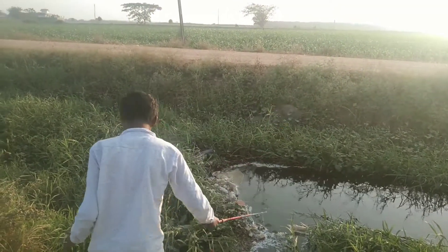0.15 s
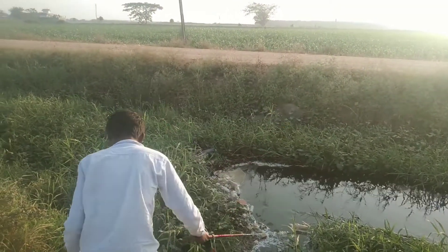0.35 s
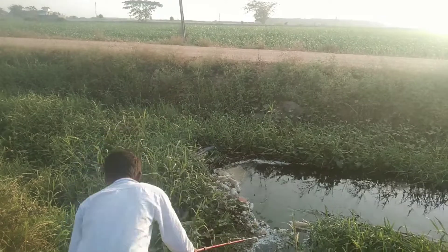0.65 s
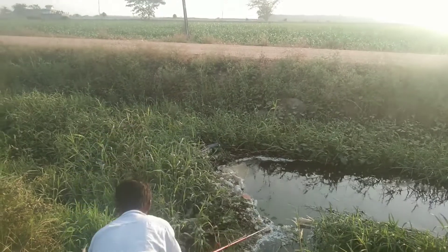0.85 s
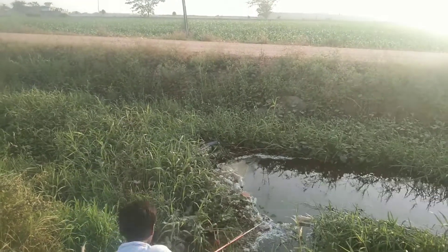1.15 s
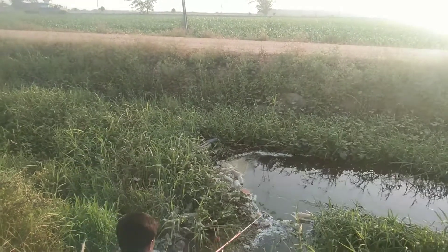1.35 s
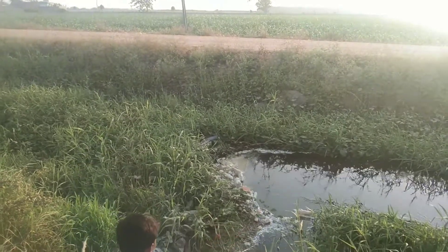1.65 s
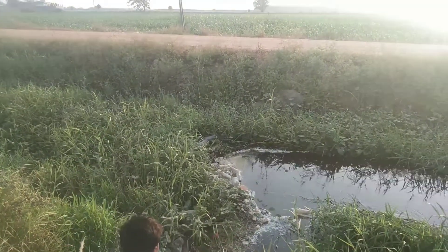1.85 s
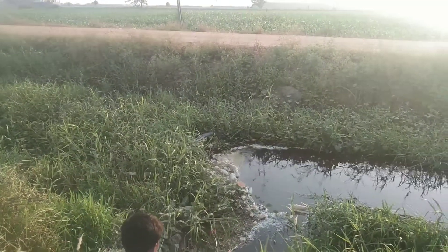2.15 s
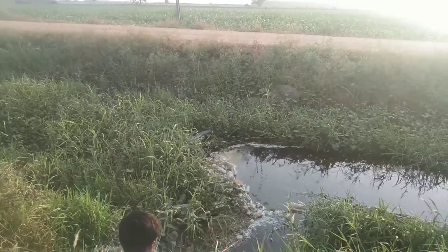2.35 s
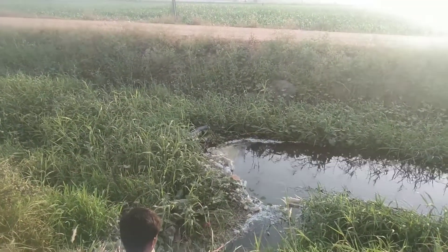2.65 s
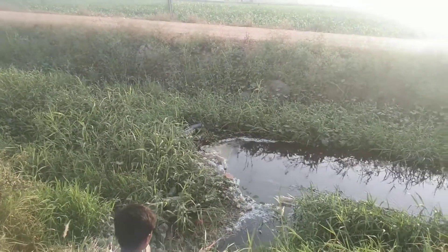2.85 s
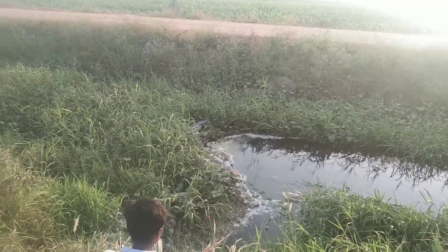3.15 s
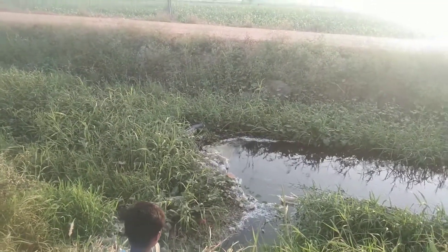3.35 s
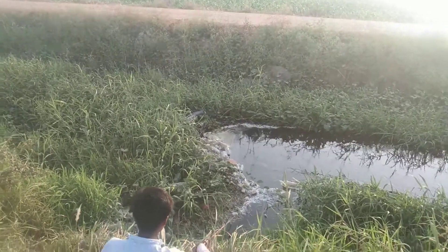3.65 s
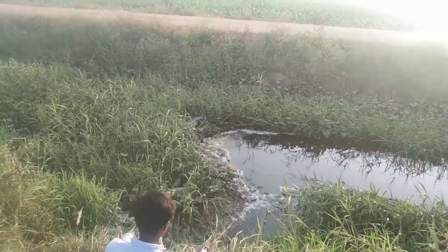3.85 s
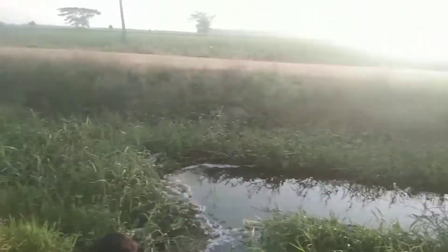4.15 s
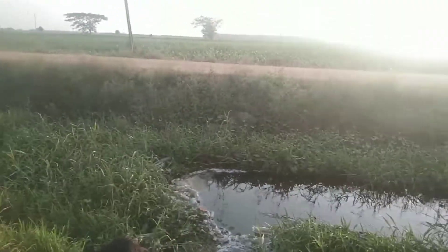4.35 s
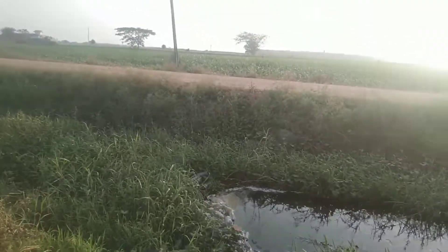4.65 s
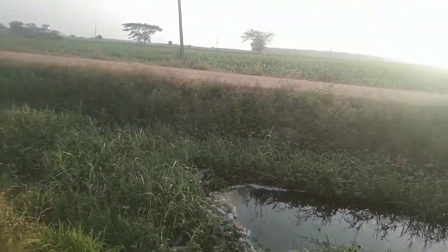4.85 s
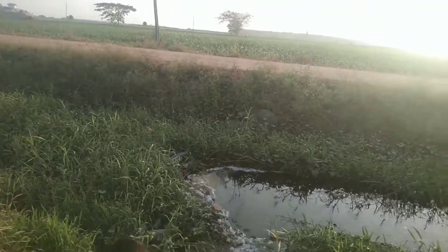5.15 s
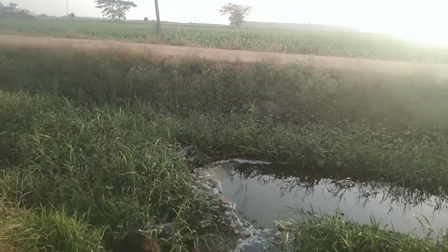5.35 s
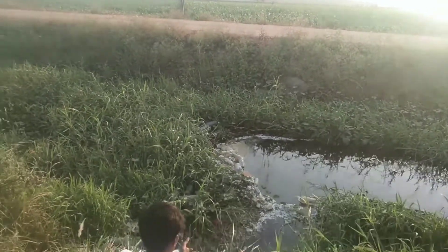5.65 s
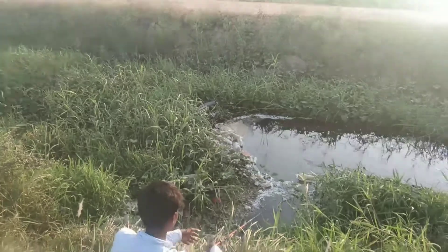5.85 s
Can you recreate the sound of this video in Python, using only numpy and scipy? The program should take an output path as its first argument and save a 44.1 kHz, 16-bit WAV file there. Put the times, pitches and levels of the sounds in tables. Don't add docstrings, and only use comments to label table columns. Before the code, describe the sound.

A phone-like microphone in open fields catches a low, pulsing motorcycle pulling away, its valve gear and chain rattling over tyre noise. Crisp grass brushing, snapping stems and faint cloth slides sit very near. Midway come a quick chirp, soft thuds and a small rubbing squeak. High insect trills grow clearer over the faint field hiss, before crackling stalks and a final loud, short knock with scratchy ticks.

```python
import sys
import numpy as np
from scipy import signal
from scipy.fft import rfft, irfft
from scipy.io import wavfile
from scipy.ndimage import uniform_filter1d

SR = 44100
rng = np.random.default_rng(int(sys.argv[2]) if len(sys.argv) > 2 else 0)


def pcm_store(signal):
    levels = np.round(np.clip(np.atleast_2d(signal), -1, 1) * 32767)
    wavfile.write(sys.argv[1], SR, levels.astype(np.int16).T)


def gain_from_db(level_db):
    decades = np.asarray(level_db, float) / 20
    return 10 ** decades


N = 264600

# pitch [Hz], width [Hz], level [dB].
CHAIN = [(6420, 300, 0), (5740, 740, 7), (4920, 1000, -2), (4450, 1440, 3.5), (3700, 70, -30)]
# pitch [Hz], width [Hz], level [dB].
AIR = [(10100, 2800, 8.5), (14200, 1900, 5), (12430, 2700, 2.5), (8400, 1400, -4)]


def level(x, db):
    return x * gain_from_db(db) / np.sqrt(np.mean(x ** 2))


def curve(table):
    s, *columns = np.transpose(table)
    return [np.interp(np.arange(N) / SR, s, c) for c in columns]


def ring(x, hz, width_hz):
    return signal.lfilter(*signal.iirpeak(hz, hz / width_hz, fs=SR), x)


def body(x, modes):
    return sum(gain_from_db(db) * ring(ring(x, hz, 1.38 * w), hz, 1.38 * w) for hz, w, db in modes)


def colour(x, spectrum):
    hz, db = np.transpose(spectrum)
    bin_hz = np.arange(N // 2 + 1) * SR / N
    return irfft(rfft(x) * gain_from_db(np.interp(np.log(bin_hz + 1), np.log(hz), db)), N)


def walk(rate):
    k = int(SR / rate)
    held = np.repeat(rng.standard_normal(N // k + 1), k)
    return 1.31 * uniform_filter1d(uniform_filter1d(held, k), k)[:N]


def grit(per_s, spread_db):
    size = gain_from_db(spread_db * np.minimum(rng.exponential(size=N), 3.5))
    strikes = (rng.random(N) < per_s / SR) * size
    return signal.lfilter([1], [1, -.98], strikes) * rng.standard_normal(N)


def add(out, s, sound):
    i = int(s * SR)
    part = sound[max(-i, 0):N - i]
    out[max(i, 0):max(i, 0) + len(part)] += part


def receding(start_db, share):
    # time [s], level [dB].
    distance = [(0, 0.5), (.5, -3), (1.0, -5), (1.7, -8.5), (2.4, -11), (3.3, -15), (3.9, -15),
                (4.4, -19.5), (5.0, -19), (6, -23.5)]
    return gain_from_db(start_db + share * curve(distance)[0])


def thump():
    # pitch [Hz], width [Hz], signed share, stages [count].
    exhaust = [(150, 50, .46, 3), (82, 44, -.45, 1), (182, 38, -.14, 2), (293, 166, -.17, 2),
               (133, 28, .93, 1)]
    out = 0
    for hz, width, share, stages in exhaust:
        part = np.r_[1., np.zeros(4000)]
        for _ in range(stages):
            part = ring(part, hz, width)
        out = out + share * part / np.abs(part).max()
    return uniform_filter1d(np.r_[np.zeros(44), out], 44)


def motorcycle():
    # time [s], firings per second.
    speed = [(0, 14.967), (.3, 15.196), (.6, 15.946), (1, 15.679), (1.2, 16.454), (1.6, 16.349),
             (1.8, 16.836), (2.2, 16.925), (2.8, 17.431), (3.3, 17.025), (3.5, 18.541), (3.8, 18.5),
             (4.2, 18.498), (4.6, 18.999), (5.3, 19.103), (6, 19.442)]
    # time [s], ping [Hz], ping [dB], valve shade [dB].
    tappet = [(0, 2550, -61, -4), (.8, 2615, -49, 4.5), (1.2, 2200, -64, 1.5), (1.8, 2160, -61, 4),
              (3.2, 2200, -57, 3), (3.5, 2140, -60, 1.5), (3.9, 1620, -71, -24), (4.3, 1630, -61, -3),
              (4.8, 1615, -64, 4), (6, 1600, -57.5, -25)]
    # time [s], level [dB].
    case_shade = [(0, -5), (.2, 0.5), (.65, 1.5), (1.2, 0), (1.75, 4), (2.3, 4), (3, 4.5), (3.5, 4),
                  (3.9, 3), (4.3, 1), (5.2, -5), (6, -1)]
    # frequency [Hz], density [dB per Hz].
    gas = [(1500, -15), (2500, -2), (3600, -2.5), (5200, -1.5), (7200, -1), (8500, -22), (15000, -54)]
    # pitch [Hz], width [Hz], level [dB].
    cases = [(717, 56, 3.5), (520, 270, -7), (347, 380, -1), (870, 1300, -18.5)]
    # pitch [Hz], width [Hz], level [dB].
    valves = [(2200, 240, 0.5), (1900, 75, 6.8), (2367, 204, 2.5), (2600, 450, 0.5)]
    # level at the start [dB], share of the distance loss.
    part_levels = [(-48.5, 0.72), (-53, 0.79), (-55.5, 0.36), (-68.5, 0.67)]

    cycles = .135 + np.cumsum(curve(speed)[0]) / SR
    count = np.arange(1, int(cycles[-1]) + 1)
    chance = rng.standard_normal((len(count) + 1, 5))
    fire_s = np.interp(count, cycles, np.arange(N) / SR)
    fire_s = np.r_[2 * fire_s[0] - fire_s[1], fire_s] + .0006 * chance[:, 0]
    ping_hz, ping_db, shade_db = curve(tappet)
    thumps, gate, pings, slug = np.zeros(N), np.zeros(N), np.zeros(N), thump()
    t, step = np.arange(2048) / SR, np.arange(len(slug))
    tail = 11 * np.maximum(step / SR - .014, 0)
    puff = t / 0.0064 * np.exp(1 - t / 0.011)
    ping_shape = t / 0.0095 * np.exp(1 - t / 0.0048)
    for at, luck in zip(fire_s, chance):
        pitched = np.interp(step * (1 + .025 * luck[4]), step, slug)
        damping = np.exp(-np.clip(at - .2, 0, 4) * tail)
        add(thumps, at - .0094, gain_from_db(0.9 * luck[1]) * pitched * damping)
        add(gate, at - .013, gain_from_db(1.6 * luck[2]) * puff)
        hz = ping_hz[int(max(at, 0) * SR)] * (1 + .015 * luck[4])
        tone = np.sin(2 * np.pi * hz * t * (1 + 0.38 * t))
        add(pings, at - .007, gain_from_db(1.5 * luck[3]) * ping_shape * tone)
    out = thumps * receding(-23, 0.92) + 2 * pings * gain_from_db(ping_db)

    spit = rng.standard_normal(N) + level(grit(350, spread_db=4.5), 5.1)
    hiss = colour(spit, gas) * (1.0 + 0.24 * gate ** 2) * gain_from_db(0.19 * walk(12))
    out += level(hiss, 0) * receding(-54.5, 0.91)

    beats = (0.63, 0.22, 1.0, 0.11)
    shades = (curve(case_shade)[0], shade_db, 0, 0)
    for part, modes, beat, shade in zip(part_levels, (cases, valves, CHAIN, AIR), beats, shades):
        rattle = rng.standard_normal(N) + level(grit(500, spread_db=3.5), -5.5)
        rattle = rattle * (1 + beat * gate) * gain_from_db(1.1 * walk(11))
        out += level(body(rattle, modes), -2.84) * receding(*part) * gain_from_db(shade)
    return out


def tyres():
    # time [s], roughness [dB].
    road = [
        (0, 6.5),
        (.2, 4),
        (1.4, -3.5),
        (2.3, -16),
        (3.5, 0.5),
        (4.8, 6),
        (6, -8),
    ]
    bumps = rng.standard_normal(N) * gain_from_db(2.0 * walk(14))
    roll = body(bumps, [(980, 390, 6.0), (1172, 124, 6), (1600, 78, -31)])
    return level(roll, -4.0) * receding(-53.5, 0.66) * gain_from_db(curve(road)[0])


def fields():
    # frequency [Hz], density [dB per Hz].
    land = [(24, -41), (40, -9), (70, -3), (150, -4), (235, -8.5), (417, -9.5), (740, -4), (838, -13),
            (1280, -16.5), (1600, -16.5), (1910, -20), (3000, -23.5), (3950, -22.5), (4500, -24.5),
            (5200, -21), (6700, -16.5), (7300, -19.5), (7800, -27), (9650, -40.5), (15500, -107)]
    swell = walk(0.82)
    out = np.zeros(N)
    for edges in [(45, 250), (250, 1000), (1000, 3200), (3200, 5500), (5500, 16000)]:
        band = signal.butter(2, edges, "band", fs=SR, output="sos")
        out += signal.sosfilt(band, rng.standard_normal(N)) * gain_from_db(.6 * swell + 1.2 * walk(8))
    return level(colour(out, land), -54.5)


def brush(s, rise, fall):
    t = np.arange(N) / SR - s
    return gain_from_db(-20 * np.where(t < 0, -t / rise, t / fall))


def grass():
    # peak [s], rise [s], fall [s], peak [dB], treble tilt [dB].
    clumps = [(.02, 0.057, .3, -52, -4), (.33, 0.075, 0.062, -53, 3), (.84, 0.066, 0.061, -34, -5),
              (.888, 0.032, 0.039, -38, -4.5), (.985, 0.038, 0.068, -36.5, -2),
              (1.025, 0.038, 0.12, -38.5, -4), (1.68, 0.13, 0.073, -41.5, -6.5),
              (2.294, 0.083, 0.27, -52, -10), (2.466, 0.029, .04, -51, -7), (2.55, 0.069, 0.17, -47, -7),
              (3.6, 0.1, 0.034, -52.5, -11), (3.68, 0.047, 0.17, -46.5, -11),
              (3.848, 0.073, 0.095, -46.5, -4.5), (4.334, 0.17, 0.069, -49, -5),
              (4.95, 0.041, 0.12, -62, 12.5), (5.3, 0.023, 0.32, -60, 5), (5.58, 0.087, 0.095, -58.5, 8),
              (3.47, 0.12, 0.069, -59, -15), (4.0, 0.099, 0.2, -59.5, 8)]
    # peak [s], rise [s], fall [s], peak [dB], treble tilt [dB].
    stalks = [
        (5.077, 0.0032, 0.1, -48, .1),
        (5.118, 0.046, 0.057, -37.5, -0.9),
        (5.15, 0.047, 0.036, -46.5, .1),
    ]
    # peak [s], rise [s], fall [s], peak [dB], treble tilt [dB].
    scrapes = [
        (5.886, 0.0071, 0.052, -33.5, .1),
        (5.903, 0.018, 0.027, -32.5, .1),
    ]
    # frequency [Hz], density [dB per Hz].
    green = [(150, -1), (250, -7), (646, 0), (729, -10.5), (781, -10.5), (1730, -8.5), (1890, -6),
             (2160, -7.5), (2950, -5.5), (3630, -10), (6650, -4), (8320, -23), (15500, -59)]
    # frequency [Hz], density [dB per Hz].
    dry_blades = [(180, -44), (300, -7), (484, -12), (581, -24), (674, 2), (769, -8), (907, 1), (1390, 1),
                  (2690, 0), (2880, -1), (6460, -1.5), (8010, -22), (15500, -58)]
    # frequency [Hz], density [dB per Hz].
    husk = [(180, -34), (300, -6.5), (1030, -8.5), (1350, -7.5), (1490, -9), (1840, -9), (2000, -8),
            (2740, -11), (2930, -15.5), (6460, -2), (8990, -32), (11900, -34), (15500, -23)]
    crackle = level(grit(2200, spread_db=2.0), 0) + 0.62 * rng.standard_normal(N)
    crackle = crackle * gain_from_db(2.26 * walk(70))
    out = np.zeros(N)
    for rows, blades in ((clumps, green), (stalks, dry_blades), (scrapes, husk)):
        sound = level(colour(crackle, blades), -3.5)
        low = signal.filtfilt(*signal.butter(1, 1500, fs=SR), sound)
        for s, rise, fall, db, tilt_db in rows:
            tilted = gain_from_db(-tilt_db) * low + gain_from_db(tilt_db) * (sound - low)
            out += gain_from_db(db) * brush(s, rise, fall) * tilted
    return out


def ticks():
    # start [s], peak [dB], ring [Hz], t60 [s].
    clanks = [(0.006, -39, 4500, 0.042), (0.0498, -36, 2600, .05), (0.1201, -33, 2490, 0.048),
              (0.1855, -37, 2330, .04), (0.2508, -35.5, 3380, 0.035), (0.273, -39, 4000, 0.019),
              (0.3152, -38, 3930, .03), (0.3351, -35.5, 4820, 0.05), (0.383, -37, 3620, 0.028),
              (0.4474, -41, 2670, 0.055), (0.476, -40, 4130, .03), (0.5122, -35, 3500, 0.05),
              (0.575, -44, 2500, .04), (1.329, -36, 4020, 0.03), (1.385, -44, 2150, 0.064),
              (1.475, -42, 1840, .07), (1.745, -37.5, 2200, .1), (2.045, -40, 2120, 0.079),
              (2.22, -47, 2160, 0.064), (2.345, -45, 2130, .06), (2.52, -39, 2200, 0.071),
              (2.69, -43, 2200, 0.0635), (2.745, -43, 2260, .06), (1.84, -44, 1900, 0.083),
              (1.93, -39, 2200, 0.063), (1.988, -38, 2200, .06), (2.105, -40.5, 1920, 0.065),
              (2.863, -42, 2200, 0.067), (2.92, -41, 2170, .07), (2.978, -41, 2200, .06),
              (3.152, -43, 2200, 0.075), (3.212, -44, 2190, 0.05)]
    # start [s], peak [dB], ring [Hz], t60 [s].
    case_rings = [(.111, -47, 735, 0.094), (.174, -38, 740, .12), (.241, -40, 721, .1),
                  (.376, -43, 713, .1), (.444, -39, 725, .1), (.505, -44, 762, 0.049),
                  (.563, -34, 744, 0.088), (.616, -51, 720, .1), (.637, -40, 745, 0.143),
                  (.69, -38, 740, 0.11), (.829, -40, 600, 0.055), (.856, -38, 700, 0.046)]
    # start [s], peak [dB], ring [Hz], t60 [s].
    twigs = [(0.114, -34.5, 4050, 0.056), (0.383, -35, 2730, 0.024), (0.511, -39, 2480, 0.042),
             (0.7564, -32, 2480, 0.045), (1.329, -32, 2300, 0.024), (1.8517, -36, 6310, 0.046),
             (2.104, -37, 6300, 0.023), (2.272, -38, 6750, 0.039), (2.333, -36, 6200, 0.029),
             (2.557, -36.5, 6300, 0.031), (2.953, -41.5, 5800, 0.041), (3.7523, -37.5, 6670, 0.023),
             (4.8047, -41, 3880, 0.021), (4.8995, -39, 6350, 0.026), (5.075, -38, 1280, 0.032),
             (5.113, -39, 1900, .03), (5.1197, -35, 1400, 0.037), (5.1416, -34, 1220, 0.047),
             (3.0098, -43, 6400, 0.028), (3.3281, -48, 4960, .04), (3.4428, -46, 4870, .03),
             (2.81, -45, 2150, .06), (3.04, -44, 2200, .06)]
    # start [s], peak [dB], ring [Hz], t60 [s].
    stems = [(0.8248, -34, 900, 0.032), (0.833, -31, 2940, .03), (0.8362, -29, 1970, 0.055),
             (0.845, -32, 2820, .04), (0.856, -34, 1900, 0.0406), (0.868, -39, 2430, .04),
             (0.879, -33, 3020, 0.033), (0.892, -32.5, 1450, .04), (0.8856, -32.5, 2580, .04),
             (0.9679, -34.5, 6630, 0.055), (0.9854, -34, 5560, 0.0314), (1.003, -41, 2500, .02),
             (1.0218, -32, 5200, 0.043), (1.0228, -34.5, 2080, 0.037), (1.065, -37, 6500, .03),
             (1.646, -38.5, 2460, .04), (1.672, -38, 4400, 0.037), (3.595, -43, 2280, 0.043),
             (3.685, -44, 2200, .05), (3.735, -42, 2550, .05), (3.845, -43, 2250, 0.042),
             (3.905, -45, 2790, .04), (5.084, -45, 4240, .02), (5.099, -36, 2280, .04),
             (5.142, -41, 3960, .03), (5.301, -45, 6050, .04), (5.325, -40, 5440, .03),
             (5.334, -46, 7100, .02)]
    # start [s], peak [dB], ring [Hz], t60 [s].
    husk_ticks = [
        (5.8866, -19, 6200, 0.005),
        (5.8911, -24, 6000, .006),
        (5.8953, -25, 6330, .015),
        (5.8987, -23, 6270, 0.005),
        (5.9045, -27, 6000, .015),
        (5.9148, -29, 5550, 0.006),
    ]
    strikes = [(*row, 1, 0) for row in twigs + husk_ticks + stems]
    strikes += [(*row, .9 if row[0] < 1 else .25, 1.5) for row in clanks]
    strikes += [(*row, .15, 0) for row in case_rings]
    out, t = np.zeros(N), np.arange(3000) / SR
    for s, db, hz, t60, rough, glide in strikes:
        noise = rng.standard_normal(len(t))
        crack = 0.19 * ring(noise, 4000, 4400) + 1.25 * ring(noise, hz, 0.32 * hz)
        rise_s = .07 * t60
        shape = np.minimum(t / rise_s, 1) * np.exp(-np.log(1000) * t / t60)
        tone = np.sin(2 * np.pi * hz * t * (1 + glide * (t - .015)))
        add(out, s - rise_s / 2, gain_from_db(db) * shape * (0.5 * tone + rough * crack))
    return signal.sosfilt(signal.butter(6, 7600, fs=SR, output="sos"), out)


def slides():
    # start [s], length [s], level [dB].
    strokes = [
        (0.481, 0.26, -62),
        (0.824, 0.051, -69),
        (1.391, 0.061, -66.5),
        (5.88, 0.043, -62),
    ]
    t, noise = np.arange(N) / SR, rng.standard_normal(N) * gain_from_db(1.0 * walk(20.2))
    hiss = level(body(noise, AIR), -1.1) + level(body(noise, CHAIN), 8.5)
    gain = np.zeros(N)
    for s, length, db in strokes:
        fade = np.minimum((t - s) / 0.023, (s + length - t) / 0.011)
        gain += gain_from_db(db) * np.clip(fade, 0, 1)
    return hiss * gain


def snaps():
    # start [s], peak [dB].
    clicks = [
        (0.7133, -37),
        (2.01, -45),
        (2.0323, -46),
        (3.675, -50),
        (5.8855, -44),
    ]
    out, t = np.zeros(N), np.arange(SR // 4) / SR
    for s, db in clicks:
        add(out, s, gain_from_db(db) * np.exp(-t / 0.000097) * np.cos(2 * np.pi * 13000 * t) * 1.4)
    return out


def reeds():
    # pitch [Hz], resting level [dB], swells of peak [s], width [s], level [dB].
    singers = [
        (6580, -80, [(.7, 0.12, -52), (1.8, 0.39, -55), (2.35, 0.35, -59), (3.78, 0.17, -55)]),
        (7000, -68, [(2.9, 1, -91), (4.65, 0.25, -73), (5.38, 0.057, -56), (5.6, 0.17, -66)]),
        (4490, -68.5, [(3.3, 0.041, -69), (5.0, 0.17, -67)]),
        (6000, -80, [(3.58, .04, -62), (3.75, 0.14, -58), (3.9, 0.067, -67)]),
    ]
    out, t = 0, np.arange(N) / SR
    for hz, rest_db, swells in singers:
        gain = gain_from_db(rest_db) + sum(gain_from_db(db) * np.exp(-((t - s) / width) ** 2) for s, width, db in swells)
        starts = (rng.random(N) < 170 / SR) * gain_from_db(1.8 * rng.standard_normal(N))
        notes = signal.fftconvolve(starts, np.hanning(600))[:N]
        waver = 1 + .008 * walk(2) + .012 * walk(30) + .022 * walk(400)
        tone = np.sin(2 * np.pi * np.cumsum(hz * waver) / SR)
        out = out + level(notes * tone, -4.0) * gain
    return out


def even_cricket():
    # time [s], level [dB].
    song = [(2.6, -80), (3.1, -71), (3.4, -82), (4.1, -76), (4.3, -67), (4.7, -66), (4.9, -73), (5.08, -69),
            (5.25, -76), (5.4, -66), (5.7, -69), (6, -78)]
    pitch_hz, notes_per_s = 7050, 27.5
    beat = np.cumsum(notes_per_s * (1 + .08 * walk(5))) / SR
    waver = 1 + .004 * walk(60) + .006 * walk(500)
    tone = np.sin(2 * np.pi * np.cumsum(pitch_hz * waver) / SR)
    return level(np.sin(np.pi * beat) ** 4 * gain_from_db(2.5 * walk(20)) * tone, 0) * gain_from_db(curve(song)[0])


def cricket():
    # end [s], upper wing [dB], lower wing [dB], lower wing [Hz].
    trills = [(2.68, -71, -80, 7630), (2.825, -70, -80, 7630), (2.985, -72, -74, 7630),
              (3.15, -71, -67.5, 7640), (3.305, -74, -67, 7640), (3.475, -74, -67.5, 7640),
              (3.635, -73, -71, 7650), (3.71, -74, -77, 7650), (3.84, -70, -74, 7600),
              (3.965, -71, -72, 7600), (4.1, -72, -72, 7700), (4.2, -72, -76, 7600), (4.3, -73, -71, 7500),
              (4.485, -72, -72, 7600), (4.615, -72, -70, 7800), (4.75, -71, -76, 7600),
              (4.8, -77, -71, 7750), (4.95, -77, -69, 7700), (5.1, -75, -69, 7820), (5.28, -73, -71, 7800),
              (5.445, -74, -68, 7900), (5.585, -77, -73, 7700), (5.71, -76, -67, 7930),
              (5.875, -76, -67, 7900), (6.05, -80, -71, 7930)]
    trill_s, strokes_per_s, upper_hz = 0.13, 106.3, 8190
    out, t = np.zeros(N), np.arange(int(trill_s * SR)) / SR
    stroke = np.abs(np.sin(np.pi * strokes_per_s * (t - trill_s)) ** 3) * (.7 + t / trill_s)
    which = ((trill_s - t) * strokes_per_s).astype(int)
    songs = [(1 + k * .131, -77, 8600) for k in range(12)]
    songs += [(s, up, upper_hz) for s, up, *_ in trills]
    songs += [(s, low, hz) for s, _, low, hz in trills]
    for end, db, hz in songs:
        slip, size, bend = rng.standard_normal((3, 32))[:, which]
        creep = .0006 + .0028 * (end > 4.4) * (hz < upper_hz)
        pitch = hz * (1 + .008 * bend - creep * which)
        trill = stroke * gain_from_db(1.8 * size) * np.sin(2 * np.pi * (pitch * t + slip))
        add(out, end - trill_s, level(trill, db - .5))
    return out


def whistle(table, partials):
    hz, db = curve(table)
    t = np.arange(N) / SR
    on = uniform_filter1d(1. * (t > table[0][0]) * (t < table[-1][0]), 128)
    phase = 2 * np.pi * np.cumsum(hz) / SR
    return np.sqrt(2) * on * gain_from_db(db) * sum(gain_from_db(d) * np.sin(k * phase) for k, d in partials)


def birds():
    # time [s], pitch [Hz], level [dB].
    chirp = [
        (2.528, 3220, -73),
        (2.533, 3350, -61),
        (2.536, 3700, -45.5),
        (2.541, 3850, -51),
        (2.552, 3770, -72),
    ]
    # time [s], pitch [Hz], level [dB].
    warble = [
        (3.495, 5500, -71),
        (3.51, 5720, -63.5),
        (3.525, 5600, -63.5),
        (3.54, 5380, -65.5),
        (3.555, 5200, -69),
        (3.57, 5120, -63.5),
        (3.59, 5050, -70),
    ]
    return whistle(chirp, [(0.99, 0)]) + whistle(warble, [(0.99, 0)])


def knocks():
    # start [s], peak [dB], ring [Hz], t60 [s].
    blows = [
        (2.943, -39, 130, .07),
        (2.978, -36, 92, .15),
        (3.45, -45, 90, .15),
        (4.104, -37, 82, .16),
        (5.8737, -23, 175, .022),
        (5.8772, -23, 190, .022),
    ]
    out, t = np.zeros(N), np.arange(SR // 4) / SR
    for s, db, hz, t60 in blows:
        cycles = hz * (t + 0.0015 * (1 - np.exp(-t / 0.00061)))
        add(out, s, -gain_from_db(db) * np.exp(-np.log(1000) * t / t60) * np.sin(2 * np.pi * cycles))
    return out


def cracks():
    # start [s], peak [dB], ring [Hz].
    breaks = [(5.0514, -45, 5000), (5.0985, -36, 2650), (5.1195, -29, 1300), (5.1425, -32, 1350),
              (5.1455, -35, 2200), (5.2272, -37, 1450), (5.2694, -46, 1500), (3.157, -44, 4720),
              (3.172, -46, 5500), (3.2707, -44, 4450), (3.2957, -45, 6400), (3.705, -43, 6000),
              (3.74, -43, 6200), (3.85, -43, 6300), (3.968, -45, 6000), (4.07, -46, 6300)]
    out, t = np.zeros(N), np.arange(512) / SR
    for s, db, hz in breaks:
        short_ring = np.exp(-t / .0014) * np.sin(2 * np.pi * hz * t)
        edge = .8 * np.exp(-t / .001) * rng.standard_normal(len(t))
        add(out, s, gain_from_db(db) * (short_ring + edge))
    return signal.sosfilt(signal.butter(5, (800, 6800), "band", fs=SR, output="sos"), out)


def squeak():
    # time [s], pitch [Hz], level [dB].
    rub = [
        (4.025, 3470, -76),
        (4.044, 3465, -62),
        (4.07, 3480, -67),
        (4.1, 3460, -72),
        (4.13, 3475, -65),
        (4.15, 3472, -60),
        (4.168, 3480, -69),
        (4.19, 3465, -72),
        (4.215, 3480, -79),
    ]
    # harmonic [number], level [dB].
    sides = [(7, -16), (8, -13), (9, 1.5), (10, -15)]
    # time [s], pitch [Hz], level [dB].
    broken = [
        (4.1, 3470, -80),
        (4.125, 3470, -69),
        (4.145, 3480, -68),
        (4.16, 3480, -80),
    ]
    steady = whistle(rub, [(k / 9, db) for k, db in sides])
    return steady + whistle(broken, [(8 / 9, -2), (10 / 9, 0)])


def scene():
    near = motorcycle() + tyres() + grass() + ticks() + slides() + snaps()
    near += reeds() + even_cricket() + cricket() + birds() + knocks() + cracks() + squeak()
    t = np.arange(SR // 4) / SR
    smear = rng.standard_normal(len(t)) * np.exp(-t / 0.013) * (t > .012)
    smear = signal.lfilter(*signal.butter(2, 300, "high", fs=SR), smear)
    hedge = gain_from_db(-45) * signal.fftconvolve(near, smear)[:N]
    return (near + hedge + fields())[None]


def band_limit(x):
    return signal.sosfilt(signal.butter(12, 16510, fs=SR, output="sos"), x)


def record(dry):
    bass_cut = signal.butter(2, 40, "high", fs=SR, output="sos")
    top_cut = signal.ellip(10, .2, 60, 15500, fs=SR, output="sos")
    return band_limit(signal.sosfilt(np.vstack([bass_cut, top_cut]), dry))


dry = scene()
out = record(dry)
pcm_store(out)
```